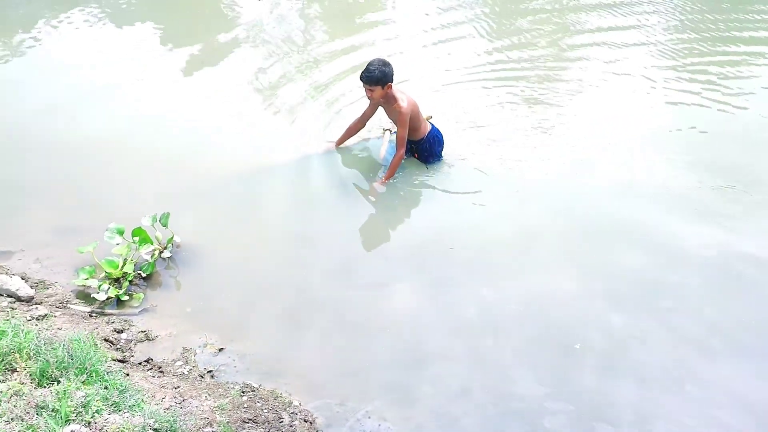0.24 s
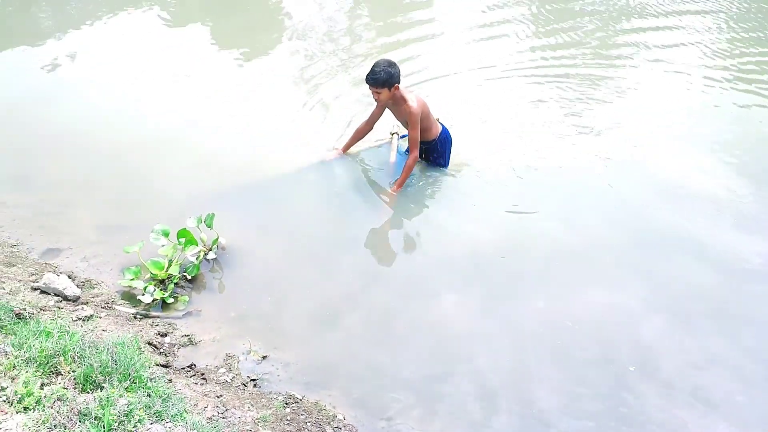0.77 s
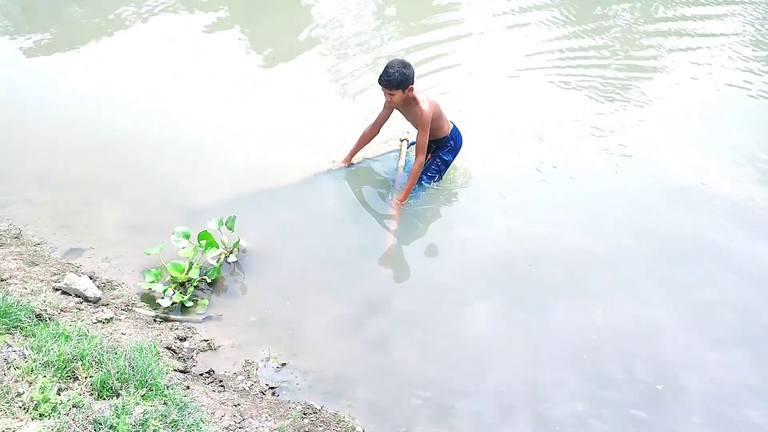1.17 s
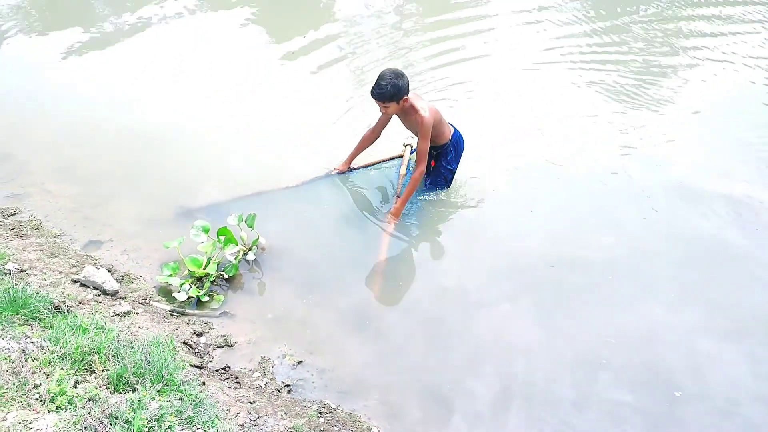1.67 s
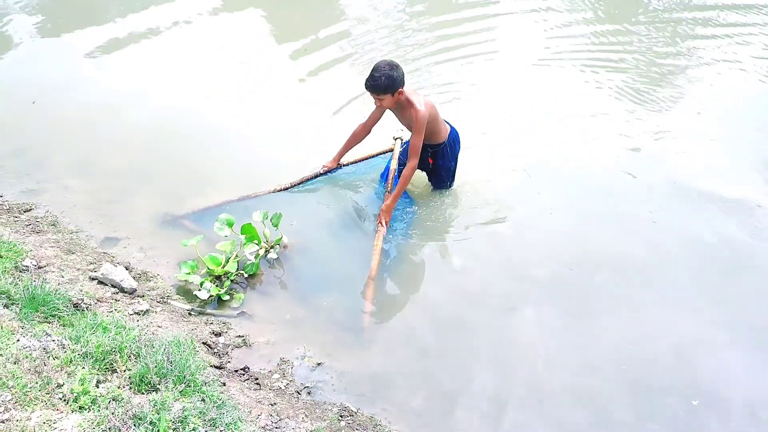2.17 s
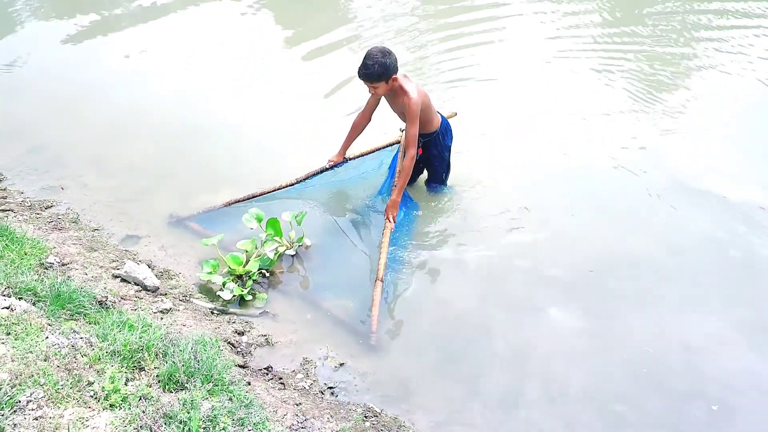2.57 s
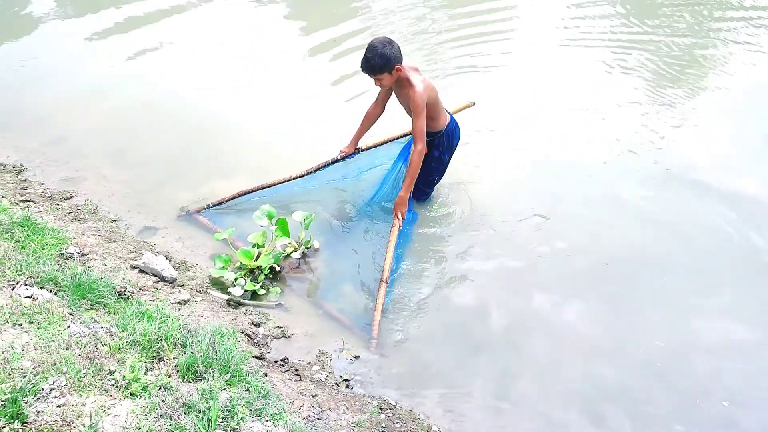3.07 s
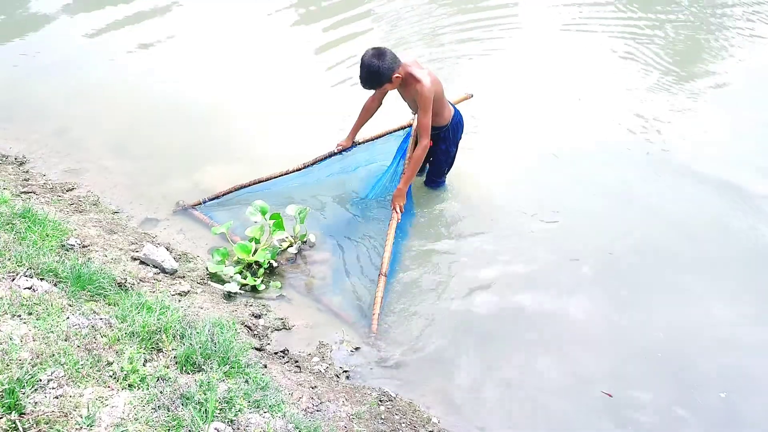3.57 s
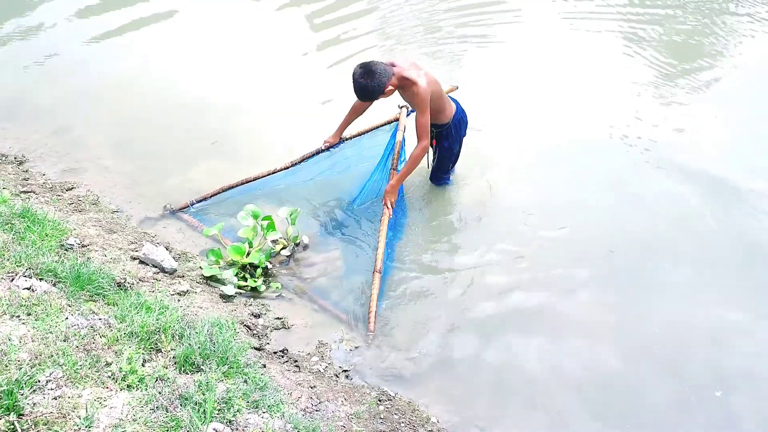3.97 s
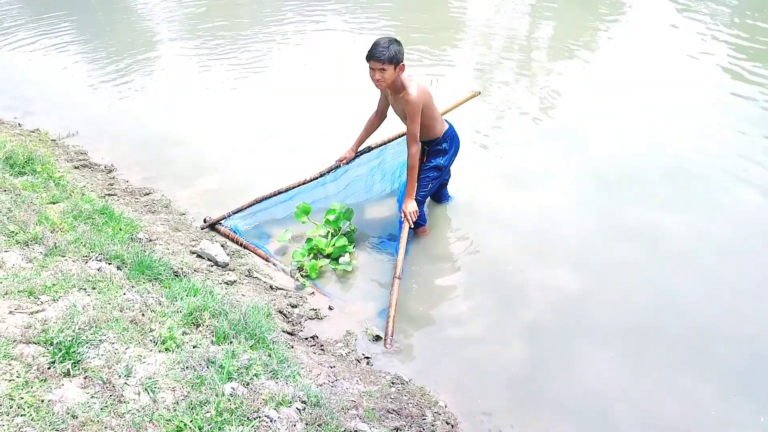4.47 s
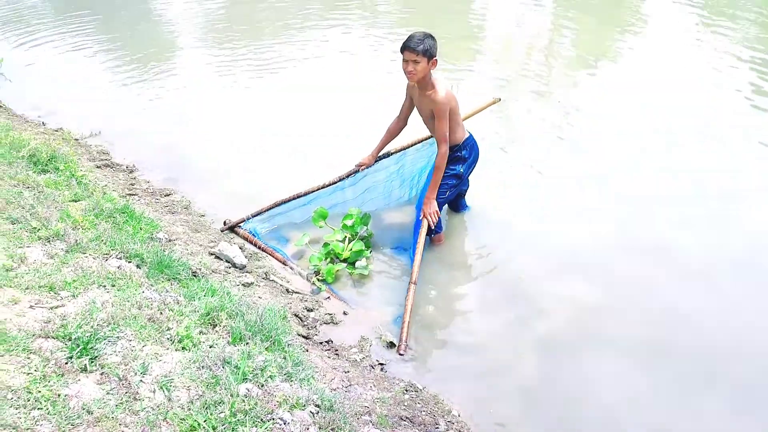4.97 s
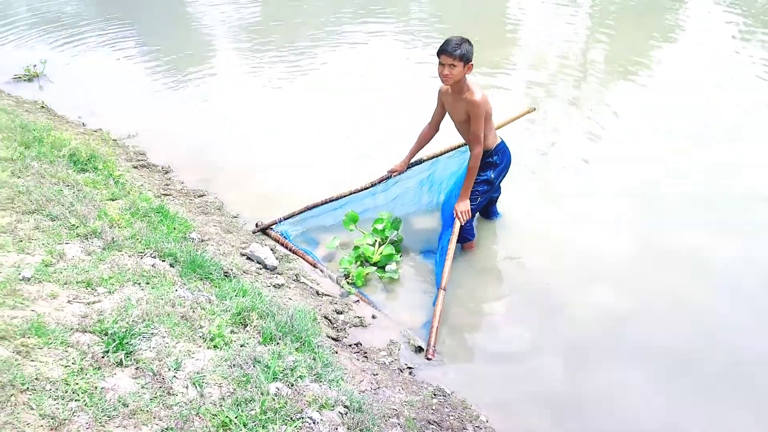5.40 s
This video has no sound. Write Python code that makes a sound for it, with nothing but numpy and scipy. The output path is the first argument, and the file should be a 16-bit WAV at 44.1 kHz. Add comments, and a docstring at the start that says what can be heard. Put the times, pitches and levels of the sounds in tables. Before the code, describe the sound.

Outdoors on a riverbank, a cicada throbs in rapid raspy syllables, leaning right, over a shimmering far insect chorus. Sharp camera-handling ticks come near one second. A small bird repeats soft rising whistles through the middle. The cicada peaks just before four seconds as faint drops plink from a net, then weakens. Near the end a bush cricket ticks quickly and wind thumps the handheld stereo microphones.

```python
"""Cicadas over a riverbank

A cicada rasps in throbbing syllables built from buckling tymbals and a ringing abdomen, over a far insect chorus.
A second cicada buzzes briefly, a bush cricket joins near the end, and a small bird repeats a rising sine whistle.
Water swishes and drips as bubble tones from a lifted net; a hand-held camera ticks as damped rings.
Filtered noise makes a faint uneven hiss that fades late, the open air, and the breeze that buffets the
microphones, strongest at the end."""
import sys
import numpy as np
from scipy import signal
from scipy.fft import rfft, irfft
from scipy.io import wavfile

SR = 44100
rng = np.random.default_rng(int(sys.argv[2]) if len(sys.argv) > 2 else 0)


def inscribe(sig):
    """Save sig as 16-bit PCM at rate SR to the path in sys.argv[1].

    A 1-D sig is mono; a 2-D sig holds one channel per row.
    Samples are clipped to [-1, 1] before scaling.
    """
    pcm = np.round(np.clip(np.atleast_2d(sig).T, -1, 1) * 32767)
    wavfile.write(sys.argv[1], SR, pcm.astype(np.int16))


N = 248724
TIME = np.arange(N) / SR
HZ = np.fft.rfftfreq(N, 1 / SR)

# Cicada syllables. Each row: start in seconds, nominal level in dB.
SYLLABLES = [(-.04, -47), (.113, -46.5), (0.262, -45.5), (.416, -46), (0.574, -47.5), (.729, -46),
             (.85, -46.5), (0.998, -44.5), (1.15, -44), (1.303, -43), (1.443, -43.5), (1.564, -44),
             (1.7, -45), (1.847, -45), (1.976, -44), (2.107, -46.5), (2.22, -46), (2.358, -46),
             (2.501, -45.5), (2.628, -44), (2.741, -44.5), (2.847, -44), (2.983, -43), (3.103, -43),
             (3.233, -41.5), (3.355, -42), (3.473, -41.5), (3.566, -42.5), (3.681, -41.5), (3.793, -40),
             (3.903, -39), (4.017, -40), (4.127, -43.5), (4.226, -45.5), (4.334, -46), (4.431, -47),
             (4.535, -46.5), (4.633, -46), (4.724, -46), (4.815, -46), (4.908, -47.5), (5.022, -46.5),
             (5.111, -49), (5.191, -47), (5.286, -49), (5.387, -49), (5.479, -49), (5.575, -54.5)]
# Stereo lean of the cicada's body tone. Each row: time in seconds, left minus right in dB.
BODY_LEAN = [(0, -9), (1.3, -6), (3.1, -8), (3.6, -13), (3.9, -14), (4.3, -8.5), (4.8, -8.5), (5.15, -8),
             (5.64, -12)]
# Tone of the sheen from the tymbal ribs. Each row: frequency in Hz, relative level in dB.
SHEEN_TONE = [(3900, -63), (4600, 6), (5600, -9), (7000, -36), (8000, 6.5), (9200, 7), (10300, 8),
              (11200, -1), (12100, -4.5), (13200, 2.5), (14400, -13)]
# Movement of the treble sheen, ahead of a fixed trim. Each row: time in seconds, relative level in dB.
SHEEN_LEVEL = [(0, -10), (.6, -8), (1.15, -10.5), (2.3, -10.5), (2.55, -9.5), (3.1, -7), (4.35, -14.5),
               (4.9, -13.5), (5.5, -5)]
# Tone of the abdomen's ringing: a modest lift from about 4.5 kHz, easing gently into the treble.
# Each row: frequency in Hz, relative level in dB.
BODY_TONE = [(3700, 1), (4200, -1), (4550, 7.5), (7700, 3.5), (8700, 1.5), (12000, -2)]
# Tone of the far chorus. Each row: frequency in Hz, relative level in dB.
CHORUS_TONE = [(3800, -57), (4600, -8.5), (5700, -4), (6300, 1), (6700, 4.5), (7200, 0.5), (7900, -5.5),
               (8700, -7.5), (10000, -9.5), (11300, -41), (12000, -33), (13000, -13.5), (14400, -23)]
# Stereo lean of the far chorus. Each row: frequency in Hz, left minus right in dB.
CHORUS_LEAN = [(4500, -6), (5700, -5.5), (6700, -13), (7500, -3), (8400, 5.5), (10000, 0.5), (13000, 13)]
# Level of the far chorus. Each row: time in seconds, level in dB.
CHORUS_LEVEL = [(0, -50.5), (.7, -50.5), (1.0, -52.5), (2.5, -50), (3.1, -52), (4.0, -50), (4.5, -54),
                (5.0, -51), (5.64, -53)]
# Level of the faint uneven hiss, fading late. Each row: time in seconds, level in dB.
HISS_LEVEL = [(0, -59), (.7, -57), (1.4, -59), (1.85, -61.5), (2.2, -58.5), (3.0, -59.5), (3.8, -60.5),
              (4.2, -63), (5.64, -68.5)]
# Tone of the faint hiss. Each row: frequency in Hz, relative level in dB.
HISS_TONE = [(1000, -20), (1600, -4), (2200, 0.5), (2900, 0), (3700, -2), (4300, -3), (6000, -4.5)]
# Tone of the open air over the river. Each row: frequency in Hz, relative level in dB.
AIR_TONE = [(20, 10), (60, 5.5), (120, -3.5), (250, -8.5), (500, -12), (1000, -15.5), (1700, -23),
            (2900, -29.5), (4100, -23), (8000, -31), (14000, -46)]
# Stereo lean of the open air. Each row: frequency in Hz, left minus right in dB.
AIR_LEAN = [(100, 1.5), (1000, -0.5), (2500, 3), (6000, -8)]
# Level of the open air. Each row: time in seconds, level in dB.
AIR_LEVEL = [(0, -56.5), (1.7, -54), (2.1, -55), (3.8, -55), (4.2, -58), (4.7, -57.5), (5.64, -55.5)]
# Breeze beneath its gusts, freshening at the end. Each row: time in seconds, nominal level in dB.
BREEZE_LEVEL = [(0, -53.5), (.9, -55), (1.4, -68), (3.8, -64), (4.2, -53), (4.85, -52), (5.05, -38),
                (5.64, -39.5)]
# Tone of the breeze's rumble. Each row: frequency in Hz, relative level in dB.
RUMBLE_TONE = [(15, 3), (40, -2), (80, -3.5), (130, -13), (220, -28), (400, -37.5), (800, -66), (2000, -86)]
# Gusts on top of the breeze. Each row: start in seconds, length in seconds, nominal level in dB,
# left minus right in dB.
GUSTS = [(.45, 0.16, -45.5, 1), (0.624, 0.24, -51.5, -4), (4.116, .18, -49.5, -4), (4.513, .11, -41.5, 4),
         (5.127, 0.13, -38.5, -11), (5.51, 0.14, -28, -5)]
# Single eddies, mostly at the right port. Each row: centre in seconds, nominal level in dB, frequency in Hz.
EDDIES = [(0.354, -31.5, 72.5), (5.146, -28, 226), (5.159, -34.5, 277), (5.526, -26.5, 112),
          (5.571, -19.5, 141), (5.574, -27, 227)]
# Buzzes of a second cicada. Each row: start in seconds, length in seconds, nominal level in dB.
ANSWERS = [(0.488, 0.041, -48), (1.52, .081, -50), (2.157, 0.074, -49), (3.516, 0.049, -41.5),
           (3.656, 0.027, -42), (4.07, 0.041, -40), (4.384, 0.059, -48.5)]
# Whistles of the bird. Each row: start in seconds, nominal level in dB.
WHISTLES = [(.674, -58), (1.709, -59), (1.99, -56), (2.272, -56), (2.547, -52.5), (2.817, -48.5),
            (3.08, -49), (3.343, -48), (3.604, -49.5), (3.867, -50.5)]
# Dry ticks of the camera case in the hand. Each row: start in seconds, nominal level in dB, frequency in Hz.
TICKS = [(.688, -46.5, 790), (1.0548, -32, 1020), (1.069, -40, 1080), (1.0824, -22.5, 950),
         (1.1705, -40.5, 980), (1.321, -38.5, 1070), (2.496, -46, 700), (2.5195, -38.5, 690),
         (2.677, -44, 1780), (2.9525, -39, 880), (3.0165, -41.5, 960), (3.0415, -39, 820),
         (4.1115, -47, 610)]
# Swishes of water and brushes against the camera. Each row: start in seconds, length in seconds,
# nominal level in dB, centre in Hz, width in octaves, left minus right in dB.
SWISHES = [(1.582, 0.2, -57.5, 2170, 0.81, -3.5), (4.792, 0.15, -59, 3500, 0.14, 0),
           (4.838, 0.22, -60.5, 1940, 0.98, -5.5), (5.157, 0.058, -51, 1750, 0.66, -2.5),
           (5.264, 0.012, -45, 1570, 0.89, -11), (5.443, 0.014, -48.5, 2400, 1, -16),
           (5.456, 0.05, -43.5, 990, 2.06, -27), (5.471, 0.044, -40.5, 2150, .8, -20)]
# Drops from the net that ring a bubble. Each row: start in seconds, nominal level in dB, starting pitch in Hz,
# time to fall 60 dB in seconds.
DRIPS = [(3.525, -56.5, 1177, 0.1), (3.884, -52, 696, .22), (3.904, -50.5, 2380, .04),
         (3.926, -40.5, 2435, 0.026), (3.94, -63, 816, 0.11), (3.988, -53.5, 967, 0.085),
         (4.06, -68, 833, 0.33)]
# Tone of the bush cricket's wing strokes. Each row: frequency in Hz, relative level in dB.
STROKE_TONE = [(4000, -14.5), (5000, 0.5), (6500, 0.5), (8300, 0.5), (9900, -2.5), (11400, -21),
               (12800, -18), (14400, -3.5)]

# a syllable fills this share of the time to the next, after a short rest
DUTY, REST_S, ATTACK_S = 0.56, 0.027, .0015
# the abdomen rings higher when the song is louder, and sags as the song goes on
BODY_HZ, USUAL_DB, HZ_PER_DB, SAG_HZ_PER_S = 6697, -44, 10, 49
EDGE_HZ = 14400


def gain_of(db):
    """Turns decibels into a factor."""
    return 10 ** (np.asarray(db) / 20)


def evened(x):
    """Scales to rms 1."""
    return x / np.sqrt(np.mean(x ** 2) + 1e-20)


def curve(rows, column=1):
    """Joins one column of a table by straight lines in time."""
    rows = np.array(rows)
    return np.interp(TIME, rows[:, 0], rows[:, column])


def spectrum(points):
    """Joins a table by straight lines over log frequency."""
    hz, value = np.transpose(points)
    return np.interp(np.log(HZ + 1), np.log(hz + 1), value)


def ears(lean_db):
    """Gives left and right gains of mean power 1."""
    pair = gain_of(np.array([[.5], [-.5]]) * lean_db)
    return pair / np.sqrt(np.mean(pair ** 2, axis=0))


def colour(x, points, lean_db=0):
    """Gives a stereo sound a tone and a balance, at rms 1."""
    shape = gain_of(spectrum(points)) * ears(lean_db)
    return evened(irfft(rfft(x) * shape, N))


def noise():
    """White noise, unrelated at the two ears."""
    return rng.standard_normal((2, N))


def waver(rate_hz):
    """A random drift of rms 1, smoothed above rate_hz."""
    smoothing = 1 + (HZ / rate_hz) ** 4
    return evened(irfft(rfft(rng.standard_normal(N)) / smoothing, N))


def arch(s, length_s):
    """A smooth swell from zero to one and back."""
    return np.sin(np.pi * np.clip((TIME - s) / length_s, 0, 1))


def add(mix, s, sound):
    """Mixes a stereo sound in at time s."""
    part = mix[:, max(round(s * SR), 0):][:, :sound.shape[1]]
    part += sound[:, :part.shape[1]]


def resonate(x, hz, width_hz):
    """A steep resonance that follows the curve hz, at rms 1."""
    turn = np.exp(2j * np.pi * np.cumsum(hz) / SR)
    r = np.exp(-np.pi * width_hz / SR)
    # shift the moving pitch down to 0 Hz, smooth twice, shift back
    smoothed = signal.lfilter([1], [1, -2 * r, r * r], x / turn)
    return evened((turn * smoothed).real)


def foliage(x, t60_s, wet_db):
    """Adds the diffuse scatter of leaves and bank as a dying noise tail."""
    t = np.arange(SR // 2) / SR
    tail = rng.standard_normal((2, len(t))) * gain_of(-60 * t / t60_s)
    tail /= np.linalg.norm(tail[0])
    return x + gain_of(wet_db) * signal.fftconvolve(x, tail, axes=1)[:, :N]


def buckles(rate_hz=274, jitter=.16, uneven_db=0.5):
    """Clean single snaps of the tymbals, with a random sign at each ear."""
    turns = np.cumsum(rate_hz * (1 + jitter * waver(150))) / SR
    snaps = np.diff(np.floor(turns), prepend=0)
    return snaps * np.sign(noise()) * gain_of(uneven_db * noise())


def tymbals(rate_hz=275, jitter=.1, snap=0.1, between=0.96, uneven_db=2):
    """The tymbals buckle a few hundred times a second, each time in a short crackle of ribs."""
    turns = np.cumsum(rate_hz * (1 + jitter * waver(90))) / SR
    # snap is a share of one cycle; between is the steady noise under the snaps
    crackle = between + np.exp(-(turns % 1) / snap)
    return noise() * crackle * gain_of(uneven_db * waver(140))


def cicada(opening_fade_s=0.034, rise_s=0.011, fade_s=0.021, glide=0.1, sheen_rise_s=0.016, sheen_fade_s=0.023,
           opening_db=-1.0, opening_mode=0.94, body_db=-1.0, low_mode=0.727, low_db=-10, sheen_db=2.5):
    """Each syllable opens with clean low snaps; the abdomen's pitch climbs and a crackling sheen swells."""
    opening, body, sheen, pitch, weight = np.zeros((5, N))
    gaps = np.diff([s for s, _ in SYLLABLES], append=N / SR)
    for (s, level_db), gap in zip(SYLLABLES, gaps):
        length = DUTY * max(gap - REST_S, .01)
        hz = BODY_HZ + HZ_PER_DB * (level_db - USUAL_DB) - SAG_HZ_PER_S * s
        t = np.maximum(TIME - s, 0)
        after = np.maximum(t - length, 0)
        effort = gain_of(level_db) * (1 - np.exp(-t / ATTACK_S)) * np.exp(-after / fade_s)
        opening += effort * np.exp(-t / opening_fade_s)
        body += effort * (1 - np.exp(-t / rise_s))
        sheen += gain_of(level_db) * (1 - np.exp(-t / sheen_rise_s)) * np.exp(-after / sheen_fade_s)
        pitch += effort * hz * (1 + glide * (np.minimum(t / length, 1) - .25))
        weight += effort
    pitch /= weight + 1e-12  # overlapping syllables share a weighted pitch

    snaps, crackle = buckles(), tymbals(between=1.0)
    first = resonate(snaps, opening_mode * pitch, width_hz=750)
    first += gain_of(low_db) * resonate(snaps, low_mode * pitch, width_hz=420)
    later = resonate(crackle, pitch, width_hz=1640)
    later += gain_of(-12.5) * resonate(tymbals(), low_mode * pitch, width_hz=1060)

    abdomen = gain_of(opening_db) * opening * colour(first, BODY_TONE)
    abdomen += gain_of(body_db) * body * colour(later, BODY_TONE)
    ribs = gain_of(sheen_db + curve(SHEEN_LEVEL)) * sheen * colour(crackle, SHEEN_TONE)
    return foliage(abdomen * ears(curve(BODY_LEAN)) + ribs, t60_s=.06, wet_db=-7)


def chorus(flicker_db=1.0):
    """Many far insects merge into one shimmering band of tymbal crackle."""
    band = colour(tymbals(rate_hz=170, between=1.0), CHORUS_TONE, spectrum(CHORUS_LEAN))
    return gain_of(curve(CHORUS_LEVEL) + flicker_db * waver(30)) * band


def faint_hiss(patchy_db=2.5, lean_db=-4):
    """A faint uneven hiss of filtered noise, strongest around 2 to 4 kHz, fades late."""
    hiss = colour(noise(), HISS_TONE, lean_db)
    return gain_of(curve(HISS_LEVEL) + patchy_db * waver(16)) * hiss


def air(flicker_db=1):
    """The open river is a soft wash of filtered noise."""
    wash = colour(noise(), AIR_TONE, spectrum(AIR_LEAN))
    return gain_of(curve(AIR_LEVEL) + flicker_db * waver(13)) * wash


def breeze(lumpy_db=2, port_db=2, eddy_lean_db=-20):
    """Lumpy turbulence at each microphone port swells in gusts, with a few single eddies."""
    strength = gain_of(curve(BREEZE_LEVEL) + port_db * np.array([waver(9.7), waver(7.4)]))
    for s, length, level_db, lean_db in GUSTS:
        strength += gain_of(level_db) * ears(lean_db) * arch(s, length)
    out = strength * gain_of(lumpy_db * waver(32)) * colour(noise(), RUMBLE_TONE)
    for s, level_db, hz in EDDIES:
        u = np.pi * hz * (TIME - s)
        thump = (1 - 2 * u ** 2) * np.exp(-u ** 2)  # one pulse with a dip either side
        out += gain_of(level_db) * ears(eddy_lean_db) * thump
    return out


def neighbour(hz=6600, width_hz=900, lean_db=-11):
    """A cicada in another tree gives short narrow buzzes: tymbals through one fixed resonance."""
    effort = sum(gain_of(level_db) * arch(s, length) for s, length, level_db in ANSWERS)
    return effort * ears(lean_db) * resonate(tymbals(), np.full(N, hz), width_hz)


def bird(length_s=.072, start_hz=2750, end_hz=4130, bend=2.0, lean_db=-7):
    """A near sine holds its note softly, then swells as it sweeps up."""
    out = np.zeros((2, N))
    u = np.arange(0, length_s, 1 / SR) / length_s
    swell = np.sin(np.pi * u) ** .5 * (.5 + 2 * u ** 2) / 2
    for s, level_db in WHISTLES:
        tuning = 1 + 0.0106 * rng.standard_normal()  # each whistle lands slightly off
        hz = (start_hz + (end_hz - start_hz) * u ** bend) * tuning
        whistle = swell * np.sin(2 * np.pi * np.cumsum(hz) / SR)
        add(out, s, gain_of(level_db) * ears(lean_db) * whistle)
    return foliage(out * gain_of(1.2 * waver(120)), t60_s=.12, wet_db=-6)


def ticks(peak_cycles=1.0, sharp=4.8, crack_mode=2.74, crack_db=-19, lean_db=1.5):
    """Each tick of the case is a heavily damped ring of two or three cycles, with a fainter high mode."""
    out, t = np.zeros((2, N)), np.arange(SR // 40) / SR
    for s, level_db, hz in TICKS:
        u, angle = hz * t / peak_cycles, 2 * np.pi * hz * t
        ring = np.sin(angle) + gain_of(crack_db) * np.sin(crack_mode * angle)
        envelope = (u * np.exp(1 - u)) ** sharp
        add(out, s, gain_of(level_db) * ears(lean_db) * envelope * ring)
    return foliage(out, t60_s=.08, wet_db=-15)


def swishes(grain_db=2):
    """Water and brushes against the camera are short swells of grainy band-limited hiss."""
    out = np.zeros((2, N))
    grains = rfft(noise() * gain_of(grain_db * waver(490)))
    for s, length, level_db, hz, octaves, lean_db in SWISHES:
        band = np.exp(-.5 * (np.log2((HZ + 1) / hz) / octaves) ** 2)
        hiss = evened(irfft(grains * band, N))
        out += gain_of(level_db) * ears(lean_db) * hiss * arch(s, length)
    return out


def drips(rise_per_s=1.34):
    """A bubble's note wobbles in level, and climbs in pitch as it nears the surface."""
    out, t = np.zeros((2, N)), np.arange(SR // 5) / SR
    for s, level_db, hz, t60_s in DRIPS:
        dying = gain_of(level_db - 60 * t / t60_s) * np.minimum(t / .002, 1)  # 2 ms attack
        note = np.sin(2 * np.pi * hz * t * (1 + rise_per_s * t / 2))
        add(out, s, ears(0) * dying * note)
    return foliage(out * gain_of(2.2 * waver(90)), t60_s=.15, wet_db=-6)


def bush_cricket(level_db=-45, length_s=0.007, lean_db=5, uneven_db=1):
    """Starts late and ticks 23 times a second, one noisy scrape of the wings a tick."""
    effort = np.zeros(N)
    for s in np.arange(4.862, N / SR, .0434):
        stroke_db = level_db + uneven_db * rng.standard_normal()
        effort += gain_of(stroke_db) * arch(s - length_s / 2, length_s)
    return foliage(effort * colour(noise(), STROKE_TONE, lean_db), t60_s=0.15, wet_db=-1)


def scene():
    """Everything heard from the bank."""
    insects = cicada() + chorus() + neighbour() + bush_cricket()
    backdrop = faint_hiss() + air() + breeze()
    return insects + backdrop + bird() + ticks() + swishes() + drips()


def record(dry):
    """The recorder's band limit: a steep low-pass."""
    low_pass = signal.firwin(511, EDGE_HZ, window=("kaiser", 9), fs=SR)
    return signal.oaconvolve(dry, low_pass[None], "same")


dry = scene()
out = record(dry)
inscribe(out)
```